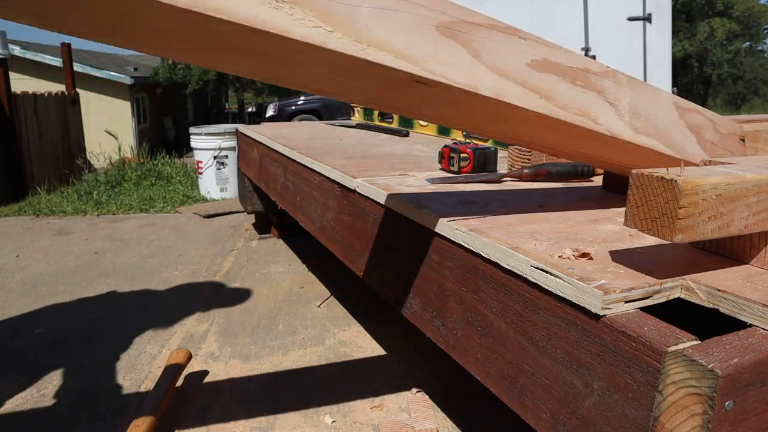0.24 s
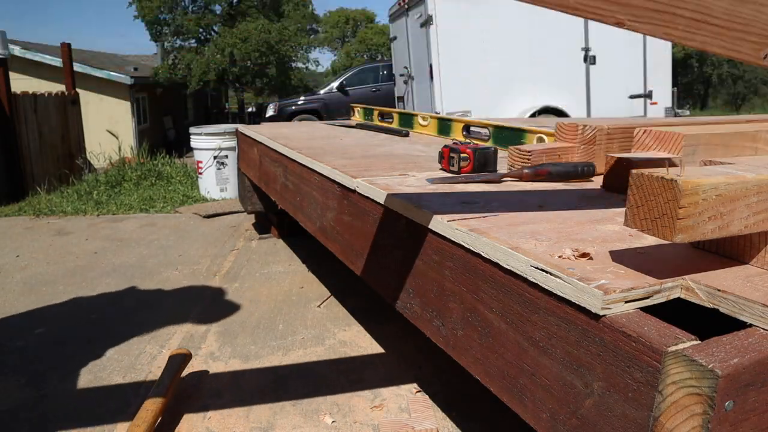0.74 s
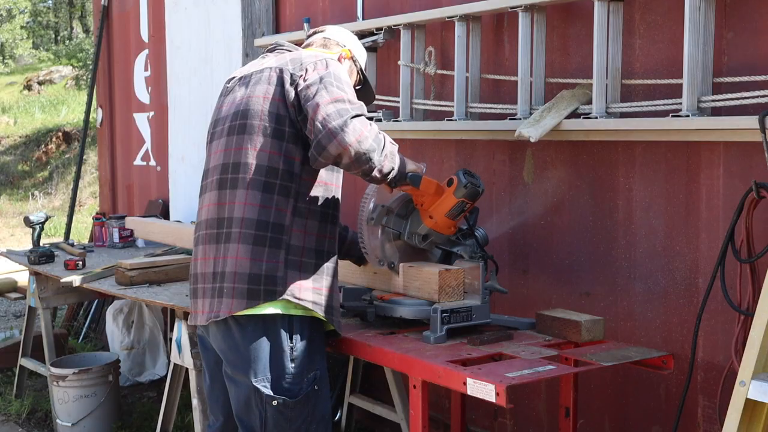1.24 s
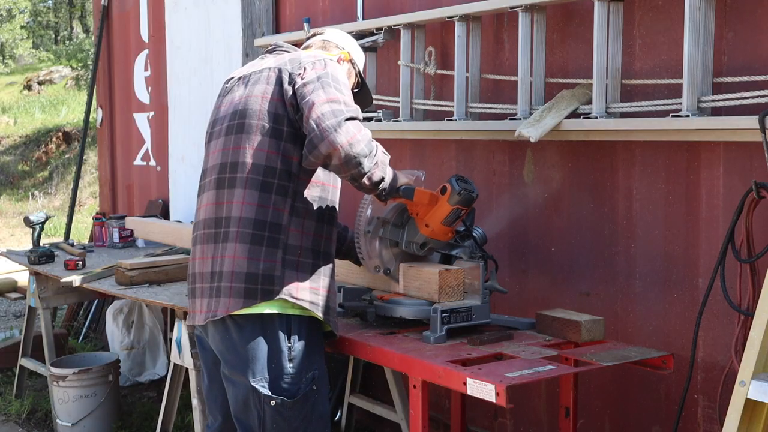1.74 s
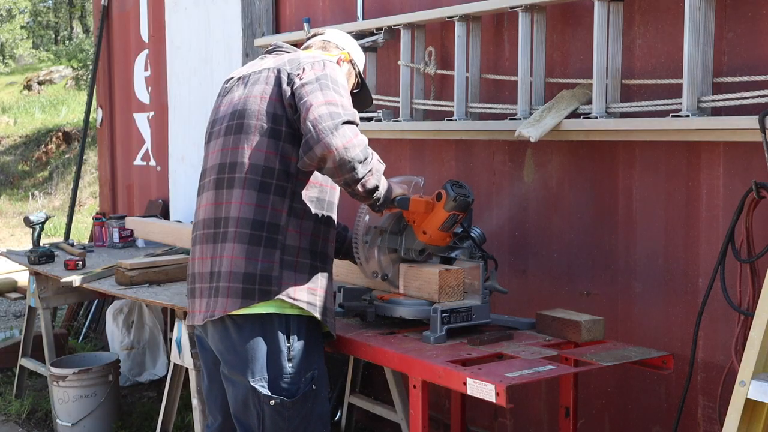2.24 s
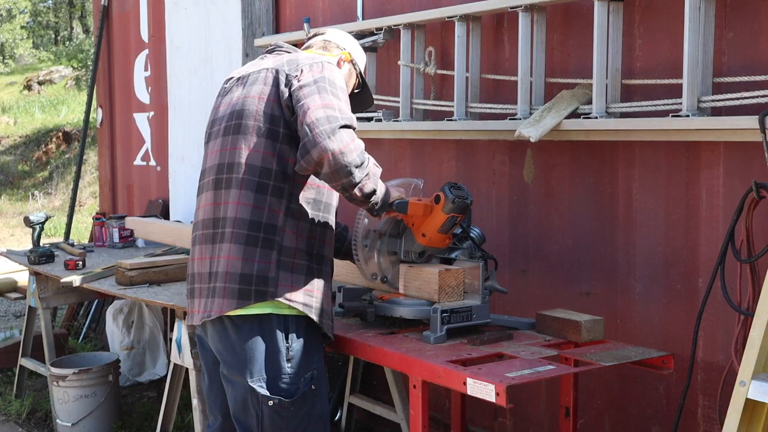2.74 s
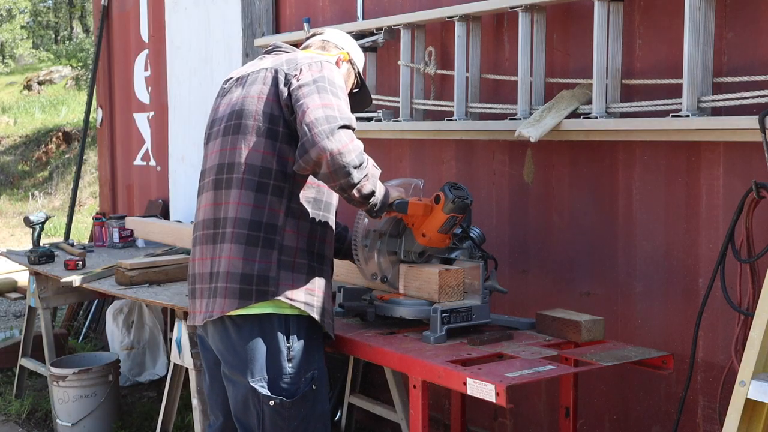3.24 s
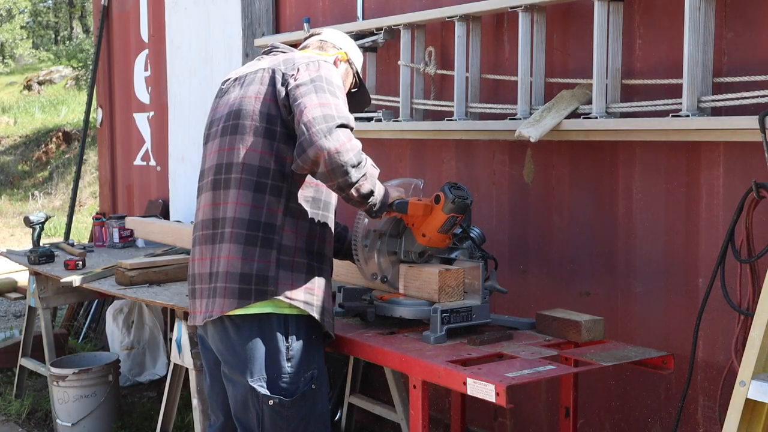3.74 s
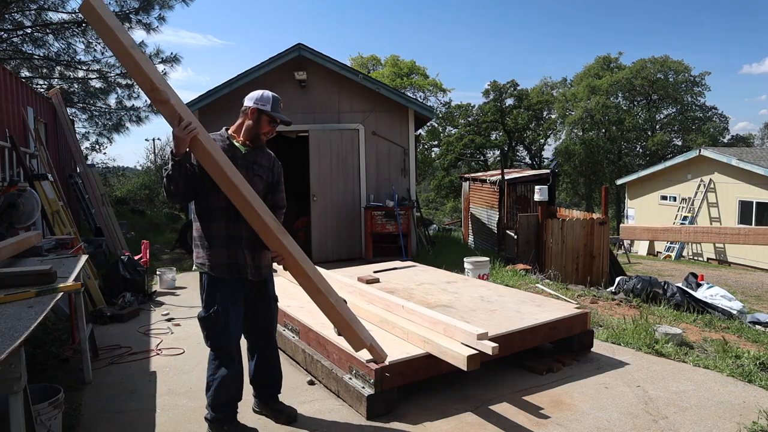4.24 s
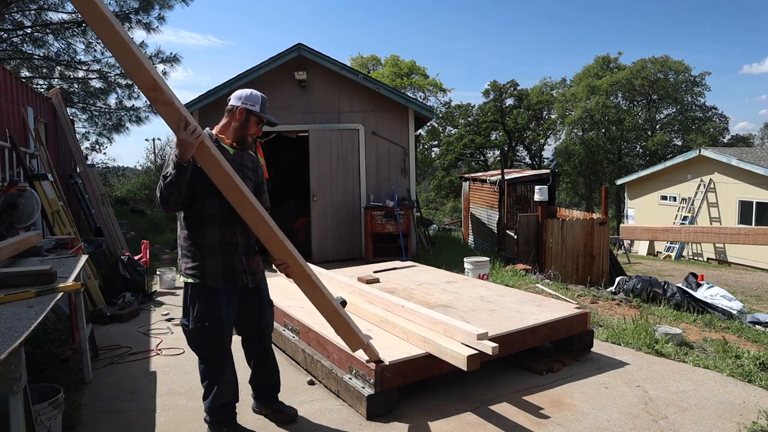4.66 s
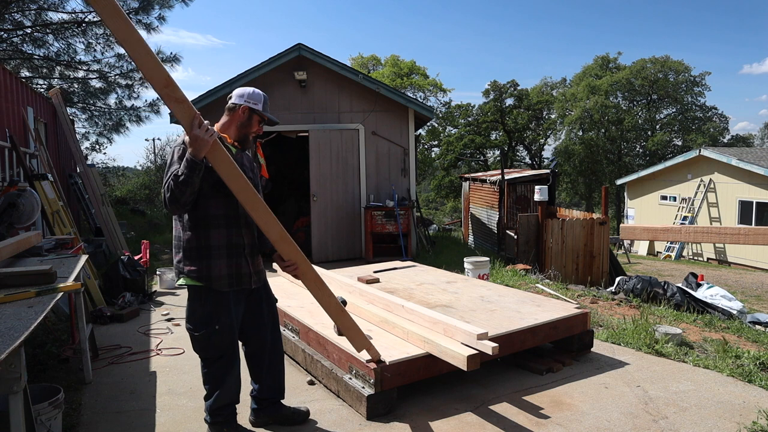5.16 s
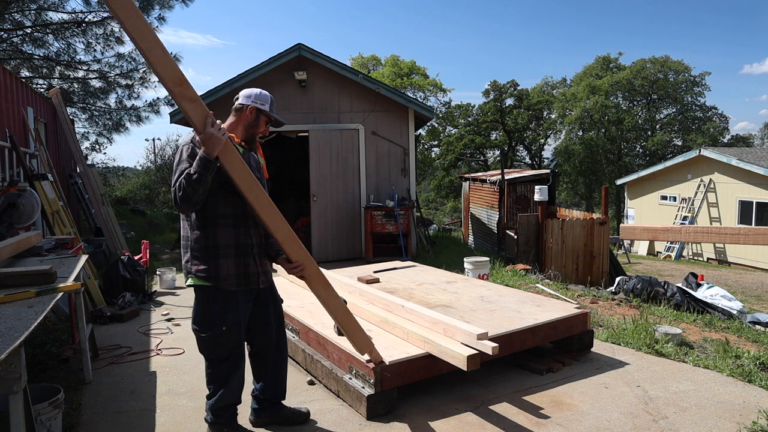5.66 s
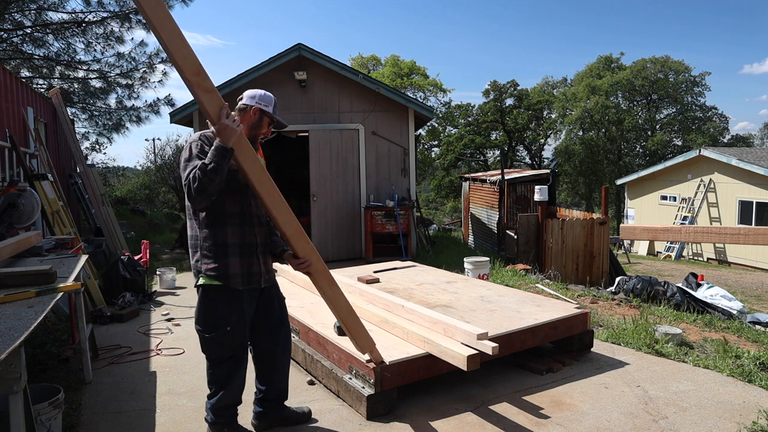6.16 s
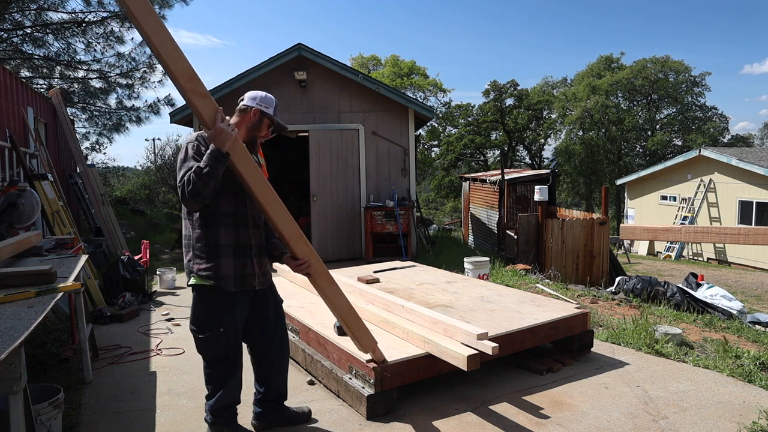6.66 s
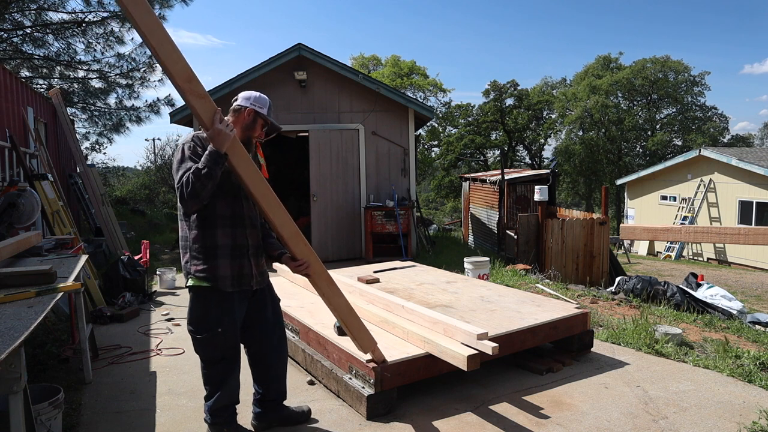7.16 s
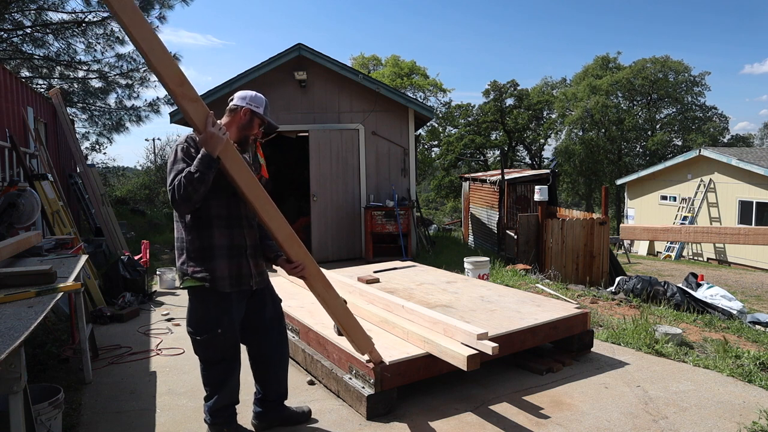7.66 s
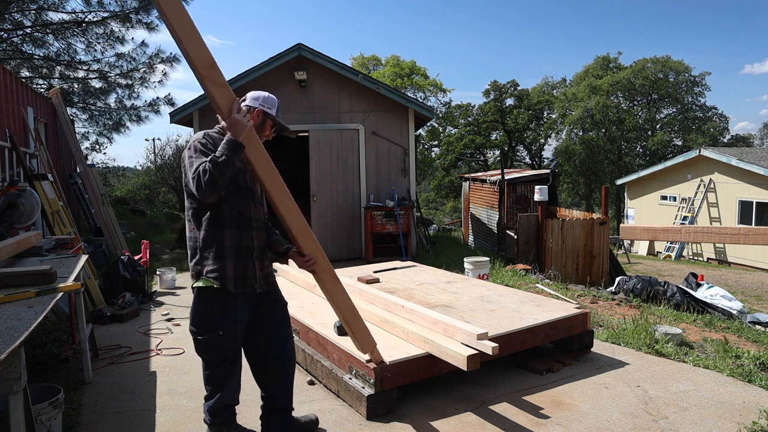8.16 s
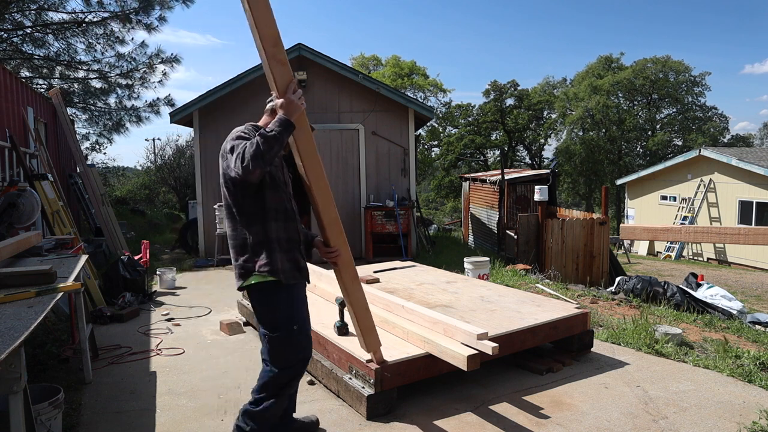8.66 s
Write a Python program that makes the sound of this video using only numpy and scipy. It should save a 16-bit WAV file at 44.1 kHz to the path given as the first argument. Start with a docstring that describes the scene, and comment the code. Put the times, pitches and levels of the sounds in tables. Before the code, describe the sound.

From 0 to 0.85 s a heavy post drags off a timber stack: a low growling judder at the start, then groaning, raspy shoves that fade by 0.5 s, with faint hoarse bird peeps and two tiny ticks. At 0.85 s a mitre saw cuts in loudly, teeth noise and bright ringing steel over rushing air and whine, bogging slightly until about 2.2 s. The cut ends near 2.4 s and the motor speeds up; at 2.73 s a short knock marks release, and the whine slides steadily down with sizzling blade and a rattly guard until a hard cut at 3.82 s. Then a quiet open yard: gritty boot scuffs and ticks around 4.2, 4.8-5.05 and 6.1 s, soft gusts, hollow deck bumps and slides at 5.6, 6.7 and most strongly 7.2-7.8 s. Faint bird peeps come near 5.1, 6.6-6.9 and 8.3 s, with a high trill at 7.7 s.

```python
"""A mitre saw cuts through a post, runs free and coasts down: teeth noise rings the steel blade, and sines
locked to the motor speed whine under rushing air. Before it, the post is dragged off a timber stack by
stick-slip pulses and random slips through wooden resonances. After it, in a quiet yard, boots scuff on
gritty concrete while the post's foot bumps and slides on the hollow deck, made of struck and rubbed modes.
Shaped noise makes the open air and hoarse peeps of far birds; sines make thin squeaks and a far trill."""
import sys
import numpy as np
from scipy import signal
from scipy.fft import rfft, irfft
from scipy.io import wavfile
from scipy.ndimage import uniform_filter1d

SR = 44100
rng = np.random.default_rng(int(sys.argv[2]) if len(sys.argv) > 2 else 0)


def log_audio(samples):
    """Write samples as a 16-bit WAV file to the path given in sys.argv[1]."""
    # one column per channel
    frames = np.atleast_2d(samples).T
    # limit to full scale, then quantise
    limited = np.clip(frames, -1, 1)
    pcm = np.round(limited * 32767).astype(np.int16)
    wavfile.write(sys.argv[1], SR, pcm)


N = 392931
T = np.arange(N) / SR  # time [s]
HZ = np.fft.rfftfreq(N, 1 / SR)  # frequency of each spectrum bin [Hz]
EDGE_HZ = 15880  # no sound above this frequency [Hz]

# open air of the yard: (frequency [Hz], relative level [dB])
YARD_SPECTRUM = [(12, -43), (20, 0), (167, -2.5), (240, -7), (300, -8), (335, -7), (385, -8), (419, -7.5),
                 (673, -8), (1080, -14.5), (3490, -25), (4490, -24), (5460, -25.5), (8530, -28),
                 (15800, -35.5)]
# open air, its quick flutter, and the breeze between gusts
AIR_DB, AIR_FLUTTER_DB, BREEZE_DB = -48.5, 1, -59
# gusts on the microphone: (time [s], length [s], level added to the breeze [dB])
GUSTS = [(4.05, 0.68, -51.5), (5.75, 0.29, -56), (6.7, 0.21, -61), (7.35, 0.56, -55)]

# hoarse peeps of far birds: (time [s], length [s], level [dB], pitch [Hz])
PEEPS = [(0.474, 0.14, -54, 3250), (0.563, 0.29, -58, 3800), (5.1, 0.57, -60, 3900),
         (6.578, 0.039, -51, 4670), (6.724, 0.038, -50, 4730), (6.843, 0.05, -47.5, 4720),
         (8.3, 0.25, -57, 4300)]
PEEP_WIDTH_HZ = 1200
# thin high squeaks: (time [s], length [s], relative level [dB], pitch [Hz])
SQUEAKS = [(4.874, 0.048, -50, 8120), (5.045, 0.006, -38, 8070), (7.885, .045, -54, 8100)]
# a far bird's trill: (time [s], length [s], relative level [dB], starting pitch [Hz], ending pitch [Hz],
# notes a second [1/s])
TRILLS = [(7.698, 0.59, -52, 6550, 5600, 14)]

# grit cracking and light wooden ticks: (time [s], peak level [dB], centre [Hz], decay by 60 dB [s])
TICKS = [(0.707, -39, 1800, .02), (0.751, -36, 2000, 0.02), (3.922, -37, 7000, .01),
         (3.979, -21.5, 2800, 0.0069), (4.227, -32, 2500, 0.03), (4.246, -34, 2000, .012),
         (4.803, -21, 5000, 0.0065), (4.824, -12.5, 6500, 0.0019), (4.838, -39, 4000, 0.0044),
         (4.848, -28, 3980, 0.0065), (4.974, -31, 3750, 0.043), (5.031, -32, 1300, 0.013),
         (5.052, -29.5, 7000, 0.017), (6.003, -27, 2700, 0.012), (6.063, -31, 2000, .01),
         (6.093, -30, 4000, .007), (6.110, -29, 3500, .007), (6.1172, -17, 2860, 0.0047),
         (6.118, -31, 9000, 0.008), (6.142, -23.5, 1150, 0.0075), (7.275, -33, 1300, 0.018),
         (7.291, -33, 1500, 0.022), (7.629, -37, 4000, 0.045), (7.709, -33, 2000, 0.013),
         (7.833, -32.5, 2200, 0.014), (8.148, -34, 9000, .006), (8.589, -31.5, 9000, .006)]
# scuffs of boots, wood and clothing: (time [s], length [s], relative level [dB], centre [Hz], width [octaves])
SCUFFS = [(0.147, 0.15, -22.5, 1490, 0.55), (3.978, 0.088, -40, 2880, 2.2), (3.979, 0.037, -32, 228, 0.81),
          (4.171, 0.22, -39.5, 1080, 3), (4.238, 0.05, -20.5, 1690, 1.33), (4.792, 0.091, -35.5, 3460, 8.3),
          (4.824, 0.034, -36, 3960, 8.1), (4.914, 0.044, -29.5, 1030, 0.76),
          (4.944, 0.074, -45, 1960, 0.47), (6.033, 0.15, -45.5, 1930, 1.6),
          (6.113, 0.024, -33.5, 2470, 4.5), (7.279, 0.041, -32.5, 1310, 1.1),
          (7.707, 0.032, -40, 1700, 0.69)]
SCUFF_RING_DB = -9.5  # how much of a scuff rings on in the post

# the post's own ring: (frequency [Hz], width [Hz], relative level [dB])
POST_MODES = [(795, 15, 8), (975, 4.3, 10), (1162, 24, 4.5), (1398, 12, 7), (1605, 48, -2.5), (1866, 10, 1),
              (2400, 22, -22)]
# the hollow deck: (frequency [Hz], width [Hz], relative level [dB])
DECK_MODES = [(76, 4.2, -1), (102, 5, -4), (134, 9.3, 5), (175.7, 21.3, 1), (199.4, 16, 1), (236, 22, -5.5),
              (278, 8.5, -10), (396, 56, -15), (544, 42, -22.5), (996, 60, -29), (1230, 39, -44)]
# the post bumps the deck: (time [s], peak level [dB])
BUMPS = [(5.571, -27), (5.73, -30), (6.697, -32), (7.293, -20), (7.333, -22), (7.373, -24), (7.622, -28),
         (7.755, -28)]
# the post's foot slides on the deck: (time [s], length [s], judder level [dB], rasp level [dB])
SLIDES = [(5.55, 0.021, -34.5, -45.5), (5.68, 0.022, -43, -49), (5.72, 0.025, -45, -60),
          (6.53, 0.027, -62, -50.5), (6.675, 0.036, -44, -45), (6.76, 0.059, -41.5, -44.5),
          (6.84, 0.033, -47, -51), (7.185, .03, -60, -51.5), (7.275, 0.032, -29.5, -42.5),
          (7.33, 0.031, -30, -68), (7.43, 0.11, -42.5, -82), (7.53, 0.075, -41.5, -44.5),
          (7.63, 0.066, -38, -67), (7.705, 0.014, -33, -48), (7.76, 0.052, -48, -68)]
# rasp of those slides: (frequency [Hz], relative level [dB])
SLIDE_RASP = [(290, -33), (500, -0.5), (1190, 4), (1500, -7), (4720, -16), (14000, -37)]

# post and stack bending: (frequency [Hz], width [Hz], relative level [dB])
DRAG_LOW = [(70, 20, -34), (152, 35, -1), (207, 18, 2), (254, 9.1, -5)]
# the groaning wood above that: (frequency [Hz], width [Hz], relative level [dB])
DRAG_MID = [(311.6, 15, 1), (348, 26, -5), (405, 15, -1), (536, 94, -12), (715, 37, -10), (866, 18, -15.5),
            (900, 27, -19)]
# rasp of the drag: (frequency [Hz], relative level [dB])
DRAG_RASP = [(530, -41), (900, -8), (1540, -12), (2610, -16.5), (3050, -18), (8660, -29.5), (11100, -38),
             (13200, -35), (15800, -50)]
# shoves that drag the post off the stack:
# (time [s], length [s], judder level [dB], groan level [dB], rasp level [dB])
SHOVES = [(-0.01, 0.037, -12, -17.5, -24), (0.06, .035, -26, -23, -27.5), (0.155, 0.049, -27, -22.5, -41),
          (0.195, 0.087, -21.5, -22.5, -38), (0.31, 0.085, -24, -29.5, -39),
          (0.435, 0.023, -26.5, -50, -53), (0.7, 0.045, -68, -75, -59)]
SLIP_HZ = 74  # the post sticks and slips regularly as it starts to move
# a stroke takes hold over the grip time; then its layers die away [dB per s]
GRIP_S, JUDDER_FALL, GROAN_FALL, RASP_FALL = 0.0082, 160, 190, 160
# the stack rocks on its bearers as the post leaves it: (time [s], peak level [dB])
ROCKS = [(0.05, -35), (0.33, -29.5)]
# that rocking: (frequency [Hz], width [Hz], relative level [dB])
ROCK_MODE = (68, 2.6, 0)

SAW_ON, SAW_OFF = 0.848, 3.822  # the saw is heard between these times [s]
# motor under power, sagging in the cut and recovering: (time [s], speed [turns a second])
DRIVEN_SPEED = [(0.85, 258), (1.0, 247.5), (1.27, 235.7), (1.4, 228.5), (1.9, 227.9), (2.02, 231),
                (2.15, 227.7), (2.4, 243.5), (2.6, 268.5), (2.7, 278.5)]
# trigger let go [s]; braking rate [1/s]; speed where air drag equals the brake [turns a second]
RELEASE_S, BRAKE_PER_S, DRAG_SPEED = 2.722, 1.24, 400
# whine of armature slots and commutator bars:
# (multiple of motor speed, relative level under power [dB], relative level coasting [dB])
WHINE_LINES = [(9, -47, -46), (16, -47, -34), (21, -43, -46), (22, -37, -52), (24, -42, -46),
               (32, -45, -39.5), (41, -51, -47), (48, -54, -45), (56, -60, -49), (64, -56, -45.5),
               (80, -70, -48), (96, -70, -47), (128, -70, -47), (160, -70, -46)]
# how the motor housing passes that whine: (frequency [Hz], gain [dB])
HOUSING = [(900, -2), (1550, -6), (1780, 8.5), (1900, 14.5), (2060, 3.5), (2300, -14.5), (2900, -3),
           (3300, 4.5), (3800, -8), (4400, 2), (4950, 5.5), (5500, -1), (6100, 6), (6800, -1), (8300, 8),
           (10000, -14), (13000, -4), (16000, -11)]
# fan and gear whine: (multiple of motor speed, relative level [dB])
GEAR_LINES = [(12, 0.5), (13, -3.5)]
# that whine is loudest at the resonances of the motor's cover: (frequency [Hz], gain [dB])
COVER = [(900, -58), (1500, -42), (1750, -33), (2200, -35), (2600, -27), (2740, -34), (2860, -27),
         (2910, -30), (2960, -25), (3010, -33), (3100, -32), (3280, -27), (3360, -34), (3450, -48)]
GEAR_DB = 1  # added to every fan and gear line

# how hard the teeth bite as the blade is fed through the post: (time [s], bite level [dB])
FEED = [(0.86, -24), (0.94, -24.5), (1.03, -25.5), (1.33, -28), (1.45, -27), (2.15, -29.5), (2.33, -28),
        (2.47, -29)]
# the bite throbs as the blade takes and clears the wood: rate [1/s], time of one crest [s], depth [dB]
THROB_PER_S, THROB_CREST_S, THROB_DB = 10, 1.33, 1.25
# sawdust and splintering: (frequency [Hz], relative level [dB])
CHIP_SPECTRUM = [(880, -25), (1500, -20.5), (2960, -7), (3530, -12), (6070, 6), (6630, -46), (8240, 5),
                 (11100, -9), (13600, -3.5), (15800, -13)]
# the blade's other modes: (frequency [Hz], width [Hz], relative level [dB])
BLADE_MODES = [(3701, 40, -7), (3951, 44, -4), (4537, 30, -5), (4672, 45, -4), (5289, 56, -7),
               (5591, 49, -5), (6298, 45, -3), (7062, 77, -6), (7991, 69, -4), (8699, 34, -6),
               (9041, 86, -9), (9310, 40, -11), (9657, 36, -14), (9867, 33, -9), (10570, 71, -16),
               (10844, 86, -17), (12193, 36, -15), (12809, 41, -17), (13318, 60, -13), (14015, 42, -17),
               (14672, 38, -15), (15081, 45, -24)]
# the three loudest blade modes: (frequency [Hz], width [Hz], level over the bite [dB])
SING_MODES = [(4354, 57, -5.5), (6205, 29, -12.5), (7210, 67, -7)]
# the blade binds and one of those three sings out: (time [s], length [s], level [dB], mode number from 0)
SINGS = [(0.838, 0.23, -26, 0), (0.887, 0.12, -19, 1), (1.06, 0.23, -22.5, 1), (1.1, 0.2, -29, 2),
         (1.29, .11, -23, 1), (1.297, 0.086, -20.5, 2), (1.394, 0.22, -29.5, 0), (1.4, 0.12, -30, 2),
         (2.17, 0.29, -24.5, 1), (2.28, 0.077, -36, 0)]

# air rushing under power: (frequency [Hz], relative level [dB])
RUSH_SPECTRUM = [(59, -76), (100, -28), (143, -31.5), (259, -14), (294, -10.5), (413, -2), (645, -7.5),
                 (732, -0.5), (1270, -7), (1470, 0), (1780, -2), (3150, -3), (3510, -6.5), (8530, -9.5),
                 (15800, -65)]
# air while coasting: (frequency [Hz], relative level [dB])
COAST_SPECTRUM = [(59, -75), (100, -39), (143, -19.5), (177, -30), (405, 0), (556, -7.5), (885, -4.5),
                  (1270, -3), (1820, -1), (3660, -8), (4920, -5), (6760, -10), (8010, -12), (10500, -19.5),
                  (15800, -27.5)]
# sizzle of the slowing blade: (frequency [Hz], width of each of two passes [Hz], relative level [dB])
SIZZLE_MODES = [(8000, 870, -0.5), (8770, 460, -1)]
# the slowing blade grazes the cut: (time [s], length [s], level added to the sizzle [dB])
GRAZES = [(2.716, .06, -32), (3.103, 0.067, -31.5)]
# layers that fade with the motor: (level at top speed [dB], loss for each halving of the speed [dB])
RUSH_LAW, COAST_LAW, HISS_LAW, SIZZLE_LAW = (-21.5, 1), (-23.5, 3.86), (-36, 10), (-26.5, 6.3)
# the coasting blade rings faintly on: (level at top speed [dB], loss for each halving of the speed [dB])
BLADE_LAW = (-39, 5.1)

# the steel stand: (frequency [Hz], width [Hz], relative level [dB])
STAND_MODES = [(428, 174, -9.5), (504, 33, -3), (761, 54, 0.5), (854, 30, 3), (929, 55, -3)]
# the rattling guard: (frequency [Hz], width [Hz], relative level [dB])
GUARD_MODES = [(846, 150, 2.5), (1140, 140, -7)]
# a brief swell of the stand's drone while coasting: (time [s], length [s], level [dB])
STAND_SWELL = (3, 0.14, -31)
STAND_BITE_DB, STAND_IDLE_DB = -3.5, -43.5  # drone relative to the bite, and drone when idle
# the guard rattles most at this motor speed [turns a second], over a span of speed [octaves]
GUARD_DB, RATTLE_SPEED, RATTLE_OCTAVES = -31, 73.6, 0.44


def amp(db):
    """Decibels to gain."""
    return 10 ** (np.asarray(db) / 20)


def unit(x):
    """Scales to an rms of one."""
    return x / np.sqrt(np.mean(x ** 2) + 1e-20)


def curves(rows):
    """Each column of a timed table, sample by sample."""
    s, *columns = np.transpose(rows)
    return [np.interp(T, s, c) for c in columns]


def during(start, end, fade):
    """One between two times, with straight ramps inside them."""
    return np.clip(np.minimum(T - start, end - T) / fade, 0, 1)


def swell(start, length):
    """A smooth rise and fall between zero and one."""
    return np.sin(np.pi * np.clip((T - start) / length, 0, 1))


def add(mix, s, sound):
    """Lays a sound into the mix."""
    part = mix[max(round(s * SR), 0):][:len(sound)]
    part += sound[:len(part)]


def read(points, hz):
    """Gain of a spectrum at the given frequencies."""
    f, db = np.transpose(points)
    return amp(np.interp(np.log(hz + 1), np.log(f + 1), db))


def colour(x, points):
    """Gives a signal a spectrum."""
    return irfft(rfft(x) * read(points, HZ), N)


def above(x, hz):
    """Steep high-pass."""
    return signal.sosfilt(signal.butter(N=4, Wn=hz, btype="high", fs=SR, output="sos"), x)


def ring(x, modes):
    """Passes a signal through resonances of alternating sign."""
    body = 0
    for k, (hz, width, db) in enumerate(modes):
        damping = 1j * HZ * width
        body = body + (-1) ** k * amp(db) * damping / (hz * hz - HZ * HZ + damping)
    return irfft(rfft(x) * body, N)


def noise():
    """White noise."""
    return rng.standard_normal(N)


def wander(rate):
    """Random drift of unit size, mostly slower than the rate [Hz]."""
    return unit(irfft(rfft(noise()) / (1 + (HZ / rate) ** 4), N))


def grains(per_s, spread_db):
    """Tiny slips at random moments; the spread varies their sizes."""
    happens = rng.random(N) < per_s / SR
    sizes = amp(spread_db * np.minimum(rng.exponential(1, N), 4))
    return unit(noise() * happens * sizes)


def echoes(x, wet_db, t60):
    """Adds a short scatter of reflections from nearby walls and ground."""
    t = np.arange(SR // 2) / SR
    scatter = rng.choice([-1., 1.], len(t)) * (rng.random(len(t)) < 2000 / SR)
    taps = scatter * (t > .003) * amp(-60 * t / t60)
    return x + amp(wet_db) * signal.oaconvolve(x, taps / np.linalg.norm(taps))[:N]


def struck(rows, modes):
    """Single blows, scaled by peak level, ring a body."""
    blows = np.zeros(N)
    for s, db in rows:
        add(blows, s, amp(db) * np.ones(1))
    return ring(blows, modes) / abs(ring(signal.unit_impulse(N), modes)).max()


def strokes(rows, column, fall):
    """Level of a run of strokes: each takes hold, lasts its length and dies away at fall dB a second."""
    power = np.zeros(N)
    for s, length, *levels_db in rows:
        t = np.arange(SR) / SR + max(-s, 0)
        grip = np.minimum(t / GRIP_S, 1)
        level = grip * amp(levels_db[column] - fall * np.maximum(t - length, 0))
        add(power, s, level ** 2)
    return np.sqrt(power)


def judder(modes, lowest_hz):
    """Coarse slips shake a wooden body, evened out to a steady strength."""
    body = unit(above(ring(grains(per_s=1500, spread_db=-1), modes), lowest_hz))
    return body / np.sqrt(uniform_filter1d(body ** 2, size=1100) + 0.011)


def rasp(spectrum):
    """Fibres catch and let go, and set the post ringing."""
    slips = grains(per_s=4500, spread_db=1.5)
    fibres = unit(echoes(colour(slips, spectrum), wet_db=-2.5, t60=0.49))
    wood = unit(above(ring(slips, POST_MODES), hz=650))
    return unit(fibres + amp(-3.5) * wood) * amp(1.1 * wander(84))


def yard():
    """Open air with a light breeze and a distant drone; it is more sheltered beside the timber stack."""
    air = unit(above(colour(noise(), YARD_SPECTRUM), hz=93)) * amp(AIR_DB + AIR_FLUTTER_DB * wander(41))
    rumble = unit(colour(noise(), [(10, -20), (30, 11), (70, 9.5), (130, -1), (400, -31)]))
    breeze = amp(BREEZE_DB) + sum(amp(db) * swell(s, length) for s, length, db in GUSTS)
    hum = amp(-68.5) * unit(ring(noise(), [(153, 12, 0)]))
    in_yard = (air + hum + breeze * rumble) * during(SAW_OFF - .02, 10, fade=0.0084)
    at_stack = (amp(-4.5) * air + amp(-52.5) * rumble) * during(-1, SAW_ON + .02, fade=.01)
    return in_yard + at_stack + amp(-74) * rumble


def peeps():
    """Short breathy notes of far birds, each a swelling band of noise about its pitch."""
    out, breath = np.zeros(N), noise()
    for s, length, db, hz in PEEPS:
        band = 1 / (1 + (2 * (HZ - hz) / PEEP_WIDTH_HZ) ** 2)
        out += amp(db) * swell(s, length) * unit(irfft(rfft(breath) * band, N))
    return out


def whistles():
    """Steady squeaks, and trills of quick falling notes, all sines with a slightly unsteady pitch."""
    out, warble = np.zeros(N), 1 + 0.0108 * wander(227)
    for s, length, db, hz in SQUEAKS:
        tone = np.sin(2 * np.pi * hz * np.cumsum(warble) / SR)
        out += amp(db) * during(s, s + length, fade=length / 3) * tone
    for s, length, db, start_hz, end_hz, per_s in TRILLS:
        note = ((T - s) * per_s + .3 * wander(6)) % 1  # place within the note, 0 to 1
        glide = np.interp(T, [s, s + length], [start_hz, end_hz])
        hz = glide * (1 + 0.21 * (.5 - note)) * warble
        tone = np.sin(np.pi * note) ** 2 * np.sin(2 * np.pi * np.cumsum(hz) / SR)
        out += amp(db) * during(s, s + length, fade=length / 4) * tone
    return out


def ticks():
    """Each tick is a quickly dying crack in one broad resonance."""
    out, t = np.zeros(N), np.arange(4000) / SR
    for s, db, hz, t60 in TICKS:
        b, a = signal.iirpeak(hz, .7, fs=SR)
        crack = signal.lfilter(b, a, rng.standard_normal(len(t)) * amp(-60 * t / t60))
        add(out, s, amp(db) * crack / abs(crack).max())
    return out


def scuffs():
    """Short gritty strokes that swell quickly and fade."""
    out, grit = np.zeros(N), grains(per_s=14000, spread_db=-0.2)
    for s, length, db, hz, octaves in SCUFFS:
        u = np.clip((T - s) / length, 0, 1)
        hump = (1 + (np.log2((HZ + 1) / hz) / octaves) ** 2 / 3) ** -2
        band = hump / np.sqrt(HZ + hz / 2)  # tilted towards the lows
        stroke = np.minimum(u / 0.14, 1) * (1 - u) * 0.89
        out += amp(db) * unit(irfft(rfft(grit) * band, N)) * stroke
    return out


def post():
    """The post's foot is bumped and slid along the hollow deck."""
    boom = strokes(SLIDES, 0, JUDDER_FALL) * judder(DECK_MODES, lowest_hz=70)
    scrape = strokes(SLIDES, 1, RASP_FALL) * rasp(SLIDE_RASP)
    return struck(BUMPS, DECK_MODES) + boom + scrape


def drag():
    """The post starts with a stick-slip growl, then groans and rasps off the stack."""
    slips = unit(ring(np.diff(np.floor(SLIP_HZ * T), prepend=0), DRAG_LOW))  # one pulse a slip
    sticking = during(-1, 0.081, fade=0.028)
    low = sticking * slips + (1 - sticking) * judder(DRAG_LOW, lowest_hz=59.6)
    shake = strokes(SHOVES, 0, JUDDER_FALL) * low
    groan = strokes(SHOVES, 1, GROAN_FALL) * judder(DRAG_MID, lowest_hz=277)
    scrape = strokes(SHOVES, 2, RASP_FALL) * rasp(DRAG_RASP)
    rocking = struck(ROCKS, [ROCK_MODE])
    return (shake + groan + scrape + rocking) * during(0, SAW_ON, fade=0.001)


def motor_speed():
    """Turns a second: set by the load, then run down by the brake and by air drag."""
    driven, = curves(DRIVEN_SPEED)
    braking = np.exp(BRAKE_PER_S * np.maximum(T - RELEASE_S, 0))
    return 1 / ((1 / driven + 1 / DRAG_SPEED) * braking - 1 / DRAG_SPEED)


def fading(law, speed):
    """Gain of a layer that fades as the motor slows."""
    top_db, halving_db = law
    return amp(top_db + halving_db * np.log2(speed / speed.max()))


def whine(speed, powered):
    """Multiples of the motor speed flutter; the armature's lines swell as they sweep the housing's resonances."""
    flutter = 1 + .0005 * wander(40) + .007 * (1 - powered) * wander(200)
    turns = np.cumsum(speed * flutter) / SR
    lines = [(k, amp(GEAR_DB + db) * read(COVER, k * speed)) for k, db in GEAR_LINES]
    for k, power_db, coast_db in WHINE_LINES:
        db = powered * power_db + (1 - powered) * coast_db + 2 * wander(14)
        in_band = k * speed < EDGE_HZ
        lines.append((k, amp(db) * read(HOUSING, k * speed) * in_band))
    tones = sum(level * np.sin(2 * np.pi * (k * turns + rng.random())) for k, level in lines)
    # the rotor's unbalance
    shaft = amp(-49.5) * (speed / speed.max()) ** 1.9 * np.sin(2 * np.pi * turns)
    # reflections off the steel wall lag behind the falling pitch and break the glides up
    broken = amp(-5) * echoes(tones, wet_db=0.5, t60=0.086)
    return powered * tones + (1 - powered) * broken + np.sqrt(2) * shaft


def drone(speed, bite_db):
    """The cut shakes the steel stand, which swells once more in the coast; the slowing motor rattles the guard."""
    s, length, swell_db = STAND_SWELL
    cut = amp(bite_db + STAND_BITE_DB) * during(0, 2.32, fade=0.18)
    late = amp(swell_db) * swell(s, length)
    level = np.sqrt(cut ** 2 + amp(STAND_IDLE_DB) ** 2 + late ** 2)
    stand = level * unit(above(ring(noise(), STAND_MODES), hz=348))
    # the guard rattles most as the motor slows through this speed
    rattle = amp(GUARD_DB) * np.exp(-(np.log2(speed / RATTLE_SPEED) / RATTLE_OCTAVES) ** 2 / 2)
    return stand + rattle * unit(above(ring(noise(), GUARD_MODES), hz=600))


def singing(drive, bite_db):
    """The loudest blade modes ring with the bite and swell when the blade binds."""
    out = np.zeros(N)
    for k, (hz, width, db) in enumerate(SING_MODES):
        binding = sum((amp(peak_db) * swell(s, length)) ** 2 for s, length, peak_db, mode in SINGS if mode == k)
        level = np.sqrt(amp(bite_db + db) ** 2 + binding)
        out += level * unit(ring(drive, [(hz, width, 0)]))
    return out


def cutting(speed, bite_db):
    """Teeth tear at the wood, harder once a turn, and set the steel blade ringing."""
    turns = np.cumsum(speed * .26) / SR  # the blade is geared down from the motor
    teeth = 1 + .5 * np.cos(2 * np.pi * 40 * turns)  # 40 teeth
    stroke = unit(teeth * amp(1.3 * np.sin(2 * np.pi * turns) + 0.81 * wander(60)))
    chips = unit(colour(stroke * grains(per_s=8300, spread_db=-1.0), CHIP_SPECTRUM))
    drive = stroke * noise()
    # six groups of modes waver separately
    steel = unit(sum(ring(drive, BLADE_MODES[k::6]) * amp(2.2 * wander(4)) for k in range(6)))
    bite = amp(bite_db) * (amp(1.5) * chips * during(0, 2.5, fade=0.11) + amp(5.0) * steel)
    # hum at one, two and three times the blade's turning
    wobble = sum(amp(db) * np.sin(2 * np.pi * k * turns) for k, db in [(1, -63), (2, -60), (3, -56)])
    return (bite + singing(drive, bite_db) + wobble) * during(0, 2.5, fade=0.047)


def rushing_air(speed, powered):
    """Smooth noise under power gives way to grainier noise coasting, both fading with the motor."""
    rush = fading(RUSH_LAW, speed) * np.sqrt(powered) * unit(colour(noise(), RUSH_SPECTRUM))
    coarse = unit(colour(grains(per_s=14000, spread_db=1.5), COAST_SPECTRUM))
    coast = fading(COAST_LAW, speed) * np.sqrt(1 - powered) * coarse
    flare_db = 3.3 * swell(2.69, 0.14)  # as the brake takes hold
    return (rush + coast) * amp(1.14 * wander(59) + flare_db)


def slowing_blade(speed, powered):
    """The blade sizzles, grazes the cut and rings faintly on as it coasts down."""
    grazing = fading(SIZZLE_LAW, speed) + sum(amp(db) * swell(s, length) for s, length, db in GRAZES)
    bright = unit(sum(ring(ring(noise(), [mode]), [mode]) for mode in SIZZLE_MODES))
    sizzle = grazing * amp(1.5 * wander(50)) * bright
    ringing = fading(BLADE_LAW, speed) * unit(ring(noise(), BLADE_MODES))
    return (sizzle + ringing) * (1 - powered)


def saw():
    """Air rush, whine and cutting; released, the head knocks on its stop and the blade sizzles as it slows."""
    speed = motor_speed()
    feed_db, = curves(FEED)
    bite_db = feed_db + THROB_DB * np.cos(2 * np.pi * THROB_PER_S * (T - THROB_CREST_S))
    powered = during(0, 2.77, fade=0.072)
    # teeth brushing out of the slot
    hiss = fading(HISS_LAW, speed) * unit(above(noise(), hz=9500)) * during(2.4, 3.8, fade=.05)
    stop = amp(-11) * np.sin(2 * np.pi * 840 * T) * during(2.731, 2.742, fade=.003)
    body = rushing_air(speed, powered) + hiss + drone(speed, bite_db) + stop
    blade = slowing_blade(speed, powered) + cutting(speed, bite_db)
    near = echoes(body + blade, wet_db=-10.0, t60=0.043)
    return (near + whine(speed, powered)) * during(SAW_ON, SAW_OFF, fade=0.012)


def scene():
    """All sources at one microphone."""
    scraping = scuffs()
    gritty = ticks() + scraping + amp(SCUFF_RING_DB) * ring(scraping, POST_MODES)
    near = echoes(gritty, wet_db=-12, t60=0.15)
    thin = echoes(amp(-1.5) * whistles(), wet_db=-3, t60=0.18) + peeps()
    return (yard() + thin + near + post() + drag() + saw())[None]


def record(dry):
    """Limits the band with a steep low-pass."""
    lowpass = signal.firwin(511, EDGE_HZ, window=("kaiser", 9), fs=SR)
    return signal.oaconvolve(dry, lowpass[None], "same")


dry = scene()
out = record(dry)
log_audio(out)
```